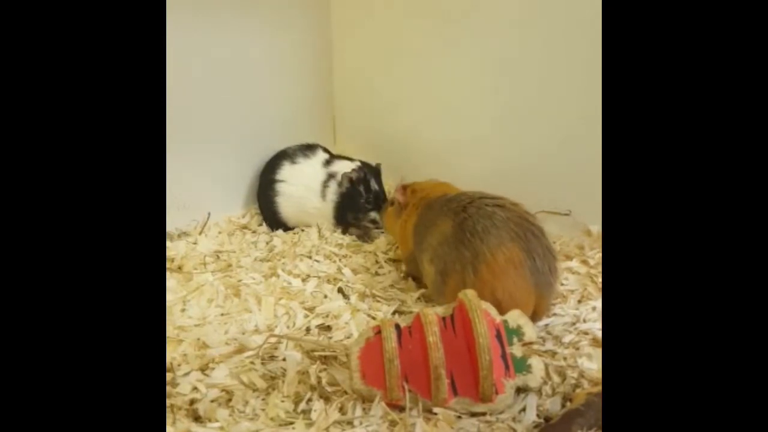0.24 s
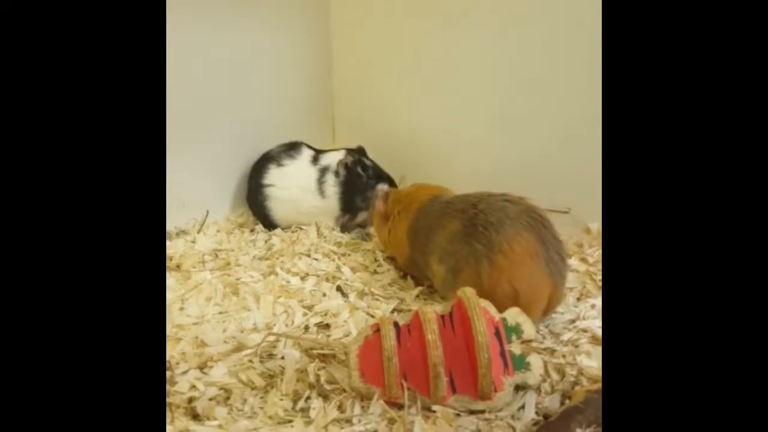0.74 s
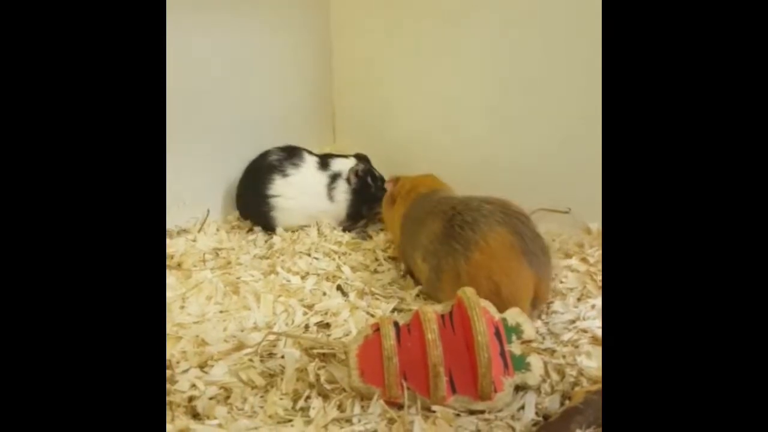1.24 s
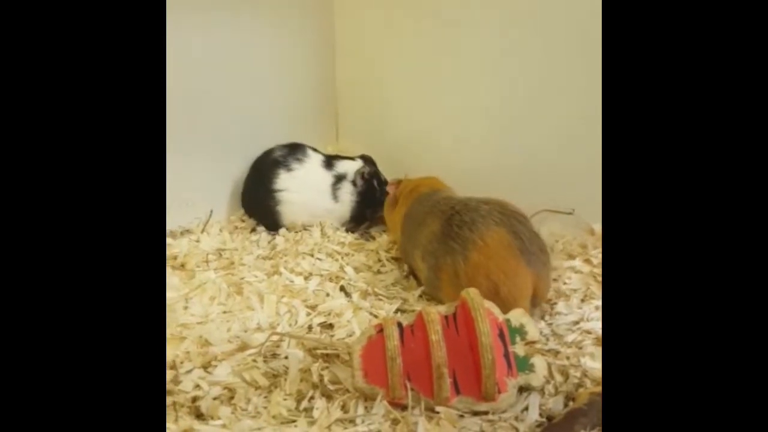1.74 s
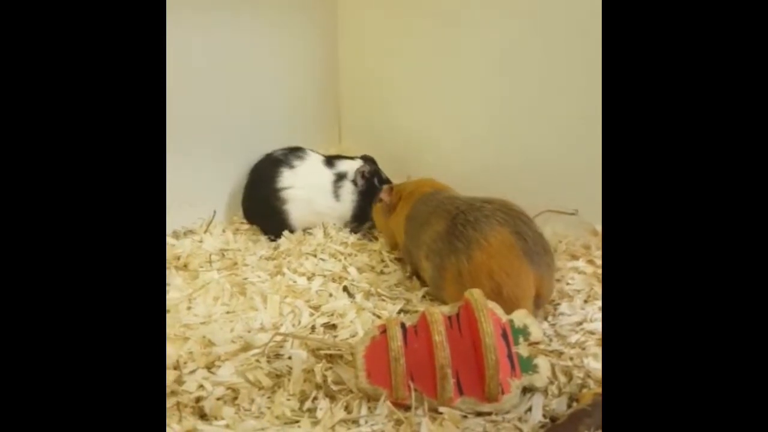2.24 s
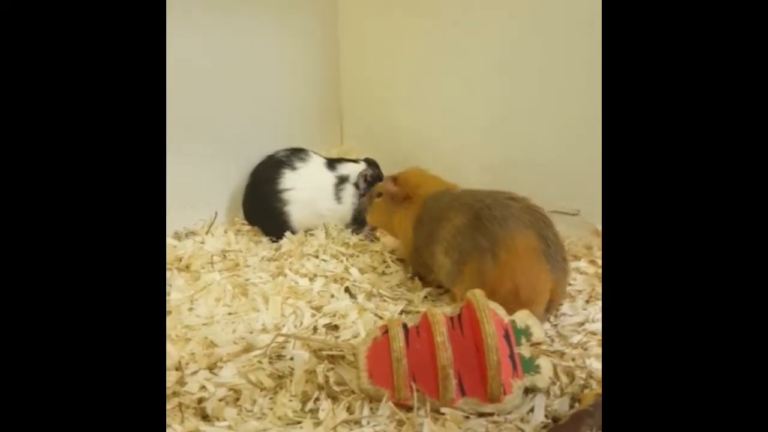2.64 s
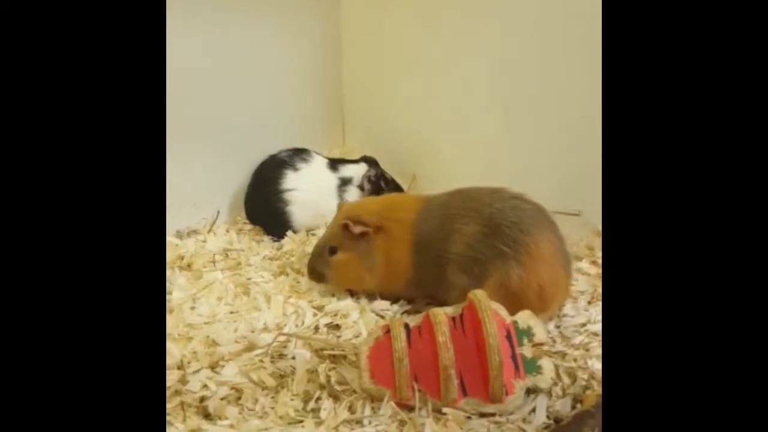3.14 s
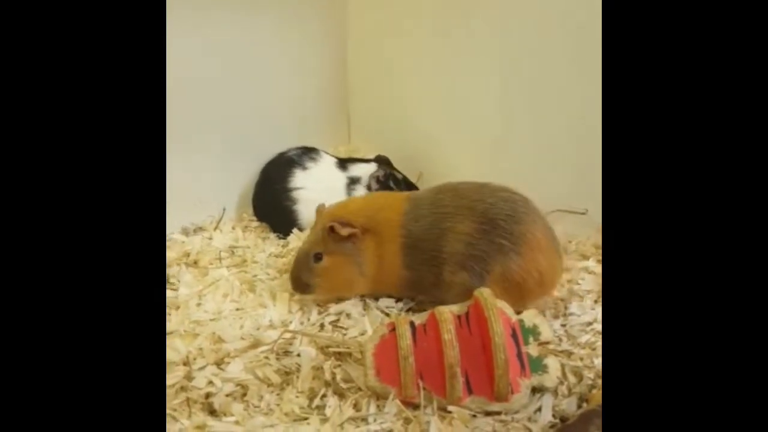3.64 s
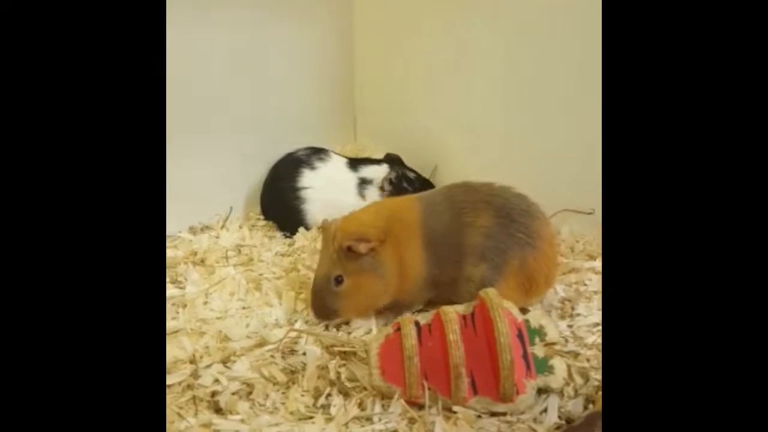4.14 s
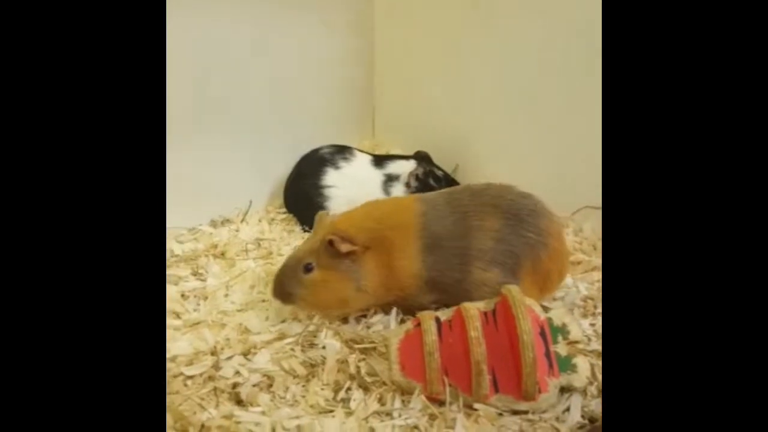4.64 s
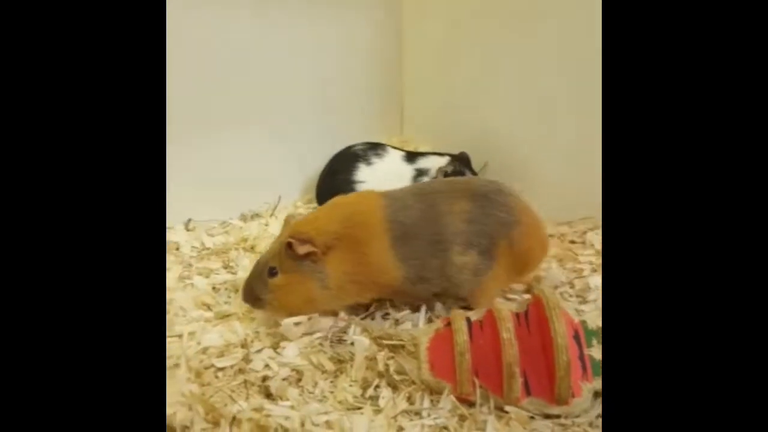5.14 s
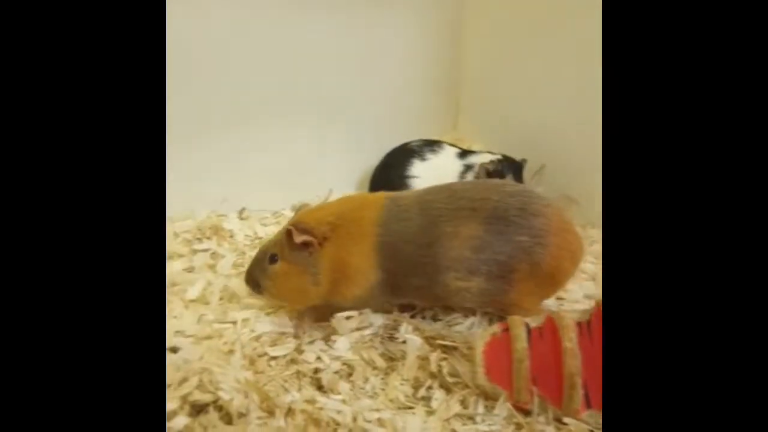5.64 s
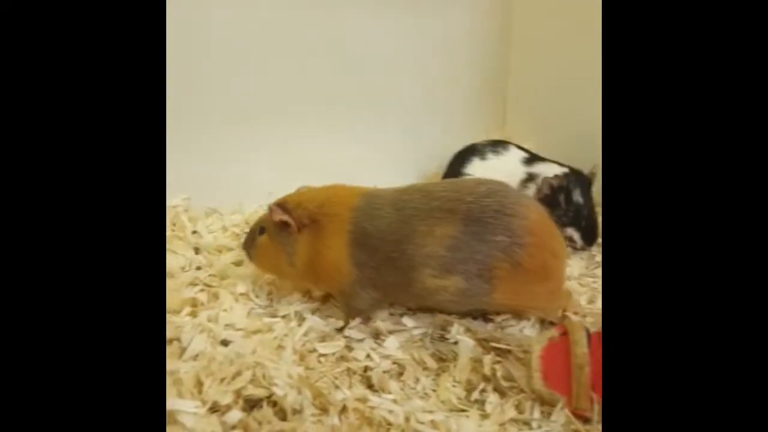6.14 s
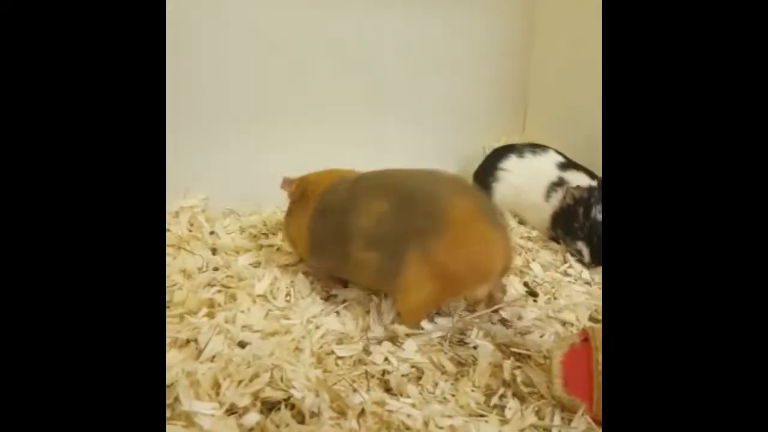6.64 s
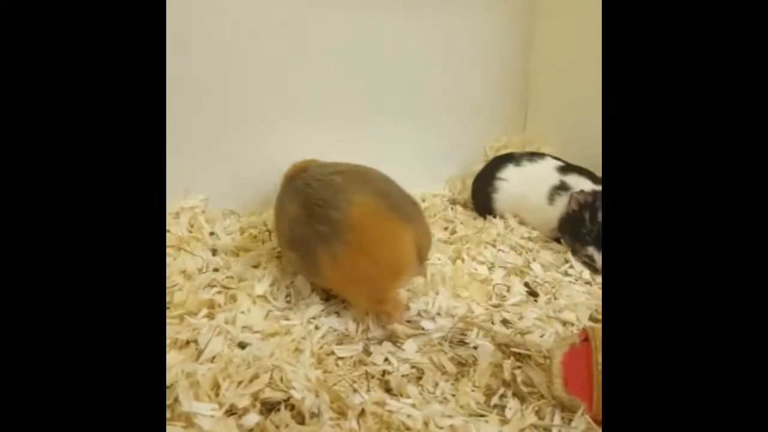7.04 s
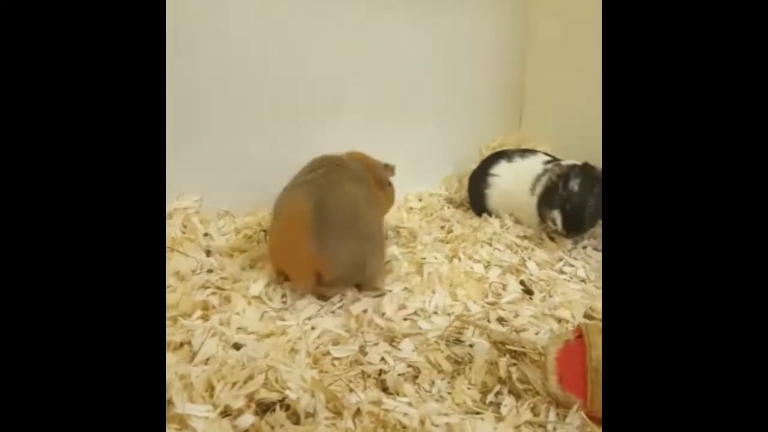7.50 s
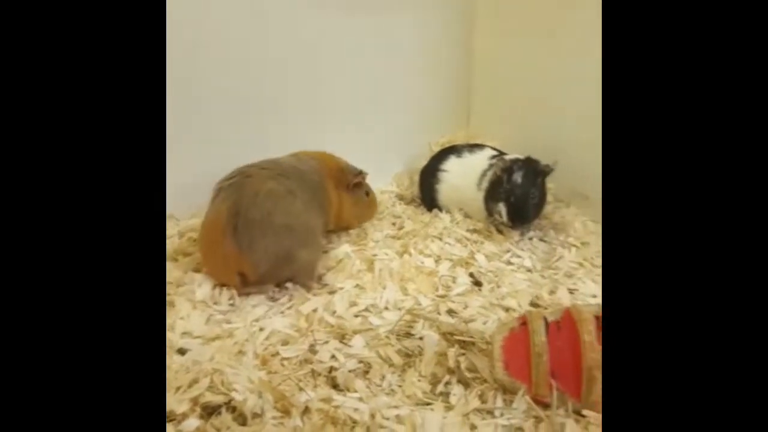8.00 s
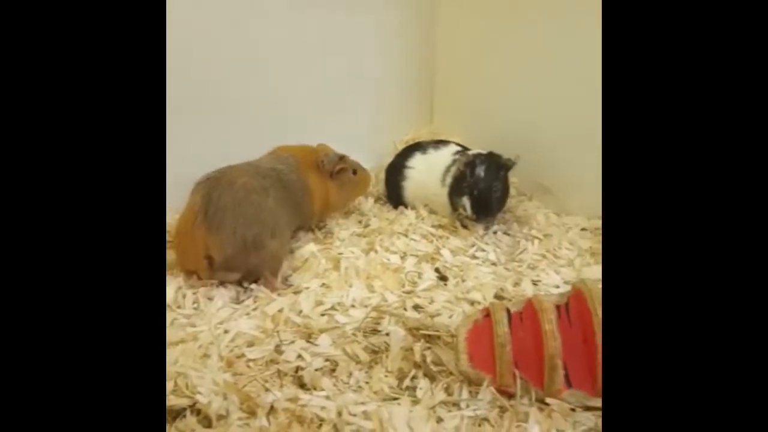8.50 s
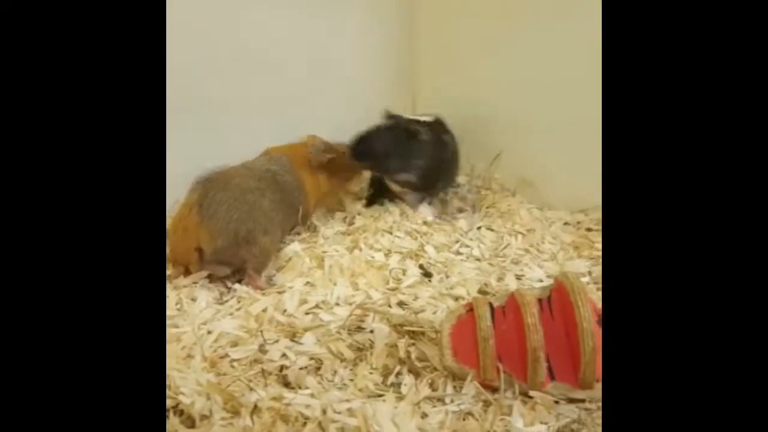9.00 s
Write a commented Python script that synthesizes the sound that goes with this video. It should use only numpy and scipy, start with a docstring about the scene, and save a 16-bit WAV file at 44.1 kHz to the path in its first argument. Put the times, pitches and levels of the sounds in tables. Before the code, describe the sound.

Rapid squeaky, raspy guinea pig chatter with two short throaty rumbles, shavings crunching underfoot, and a constant low electrical hum in a small bare room.

```python
"""Guinea pigs in wood shavings

Two guinea pigs meet in the corner of a littered pen in a small bare room, a little left of the microphones.
They chut, yip, whine and croak: swept overtones with half-pitch lines and rasp; one rumbles as it struts.
The shavings rustle and snap underfoot: noise and ringing clicks that swell with each shuffle.
An electrical appliance hums throughout, wavering tones and narrow whirring bands, over still room air."""
import sys
import numpy as np
from scipy import signal
from scipy.fft import rfft, irfft, next_fast_len
from scipy.io import wavfile

SR = 44100
rng = np.random.default_rng(int(sys.argv[2]) if len(sys.argv) > 2 else 0)


def pcm_store(signal):
    """Save signal as 16-bit PCM."""
    levels = np.round(np.clip(np.atleast_2d(signal), -1, 1) * 32767)
    wavfile.write(sys.argv[1], SR, levels.astype(np.int16).T)


N = 408366
TIME = np.arange(N) / SR

# grades of hoarseness: share of the voice that is rasp (0-1)
CLEAR, HUSKY, ROUGH, HARSH, BROKEN = .06, .19, .34, .52, .72
# a note opens just ahead of its listed time and sounds a little beyond its length
LEAD_S, OVERHANG_S = .003, 0.00814
# throat and mouth in yips and whines: hz, relative gain_db
YIP_WHINE_THROAT = [(250, 26), (400, -27), (560, 11), (800, -3.5), (1130, 10.5), (1650, -18.5), (2150, -5),
                    (2450, -12.5), (2900, -25), (3500, -40), (6000, -79)]
# spectrum of the rubbing shavings: hz, relative density_db (per Hz)
SHAVINGS_SPECTRUM = [(150, 8), (400, 4), (900, 6), (1800, 5.5), (3000, 5), (4500, 0), (6500, -1.5),
                     (9000, -1), (10500, -12), (12500, -1.5), (15500, -9)]


def from_db(db):
    """Decibels to an amplitude factor."""
    return 10 ** (np.asarray(db) / 20)


def rms_one(x):
    """Scale a sound to rms 1."""
    return x / np.sqrt(np.mean(x ** 2) + 1e-20)


def at_hz(points, hz):
    """A spectrum read on a log-frequency axis."""
    knots, values = np.transpose(points)
    return np.interp(np.log(np.maximum(hz, 1)), np.log(knots), values)


def colour(x, spectrum):
    """Give a sound the shape of a spectrum."""
    size = next_fast_len(x.shape[-1])
    gain = from_db(at_hz(spectrum, np.fft.rfftfreq(size, 1 / SR)))
    return irfft(rfft(x, size) * gain, size)[..., :x.shape[-1]]


def swings(rate_hz, t, knot_count=1024):
    """Smooth chance over the times t, up to a given rate; spread 1."""
    knots = rng.standard_normal(knot_count)
    return np.interp(t * 2 * rate_hz, np.arange(knot_count), knots) * np.sqrt(3 / 2)


def drift(rate_hz):
    """Smooth chance over the whole scene; spread 1."""
    return swings(rate_hz, TIME, N // 8)


def stereo_noise(spectrum):
    """Coloured noise, alike at both microphones mainly in the bass; rms 1."""
    # likeness of left and right: hz, correlation (-1 to 1)
    likeness = [(60, 0.85), (150, 0.8), (300, 0), (2000, 0.018)]
    size = next_fast_len(N)
    alike = np.clip(at_hz(likeness, np.fft.rfftfreq(size, 1 / SR)), -1, 1)
    mid, side = rfft(rng.standard_normal((2, size)))
    mid, side = np.sqrt(1 + alike) * mid, np.sqrt(1 - alike) * side
    pair = irfft(mid + side * [[1], [-1]], size)[:, :N]
    return rms_one(colour(pair, spectrum))


def pan(left_db):
    """Gains for both channels, left_db apart."""
    return from_db(np.array([[1], [-1]]) * left_db / 2)


def fading(hits, decay_s):
    """Each hit starts an exponential decay."""
    return signal.lfilter([1], [1, -np.exp(-1 / (decay_s * SR))], hits + 1e-18)


def ages(length_s):
    """The time since the start of a note, sample by sample."""
    return np.arange(max(int(length_s * SR), 2)) / SR


def add(out, s, sound):
    """Mix a sound in at a time."""
    first = max(int(s * SR), 0)
    part = out[first:first + len(sound)]
    part += sound[:len(part)]


def room_air(level_db=-41.5):
    """Still air of the room: steady noise, weighted to the bass."""
    # its spectrum: hz, relative density_db (per Hz)
    air = [(20, -2), (50, -1), (80, 11.5), (140, -4.5), (250, 3), (450, -9.5), (900, -10.5), (2000, -18),
           (4000, -27), (9000, -30.5), (15500, -32)]
    return from_db(level_db) * stereo_noise(air)


def appliance():
    """Mains hum and motor tones, with a soft whir in the resonances of the housing."""
    # hum tones: pitch_hz, level_db (rms before waver and pan), waver (0-1)
    hum = [(100.1, -31, 0.07), (200, -45, 0.17), (247.8, -55, 0.3), (301.2, -48.5, 0.27),
           (377.8, -58, 0.33)]
    # whirring bands: centre_hz, width_hz, level_db (rms before pan)
    housing = [(648, 105, -51.5), (1636, 69, -55.5), (2600, 540, -55.5)]
    out = np.zeros((2, N))
    for hz, level_db, waver in hum:
        # a complex swing moves both loudness and phase
        swing = 1 + waver * (drift(3.6) + 1j * drift(4))
        out += from_db(level_db) * np.sqrt(2) * np.imag(swing * np.exp(2j * np.pi * hz * TIME))
    for hz, width_hz, level_db in housing:
        b, a = signal.iirpeak(hz, hz / width_hz, fs=SR)
        whir = signal.lfilter(b, a, rng.standard_normal((2, N)))
        out += from_db(level_db) * rms_one(whir)
    return out * pan(left_db=1.25)


def stirring(attack_s=0.089, settle_s=0.046, rest_db=-66, uneven_db=1.6, swell_db=5, crest=0.44):
    """How hard the bedding is stirred: each shuffle swells to a crest, wavers and settles."""
    # feet shuffling through the shavings: start_s, length_s, level_db (before swell and waver)
    shuffles = [(0.84, 0.46, -48), (1.956, 0.031, -47.5), (2.05, 0.048, -41.5), (2.759, 0.33, -54),
                (3.218, 0.019, -53), (3.837, 0.1, -44.5), (4.194, 0.044, -47.5), (4.258, 0.17, -48.5),
                (4.575, .025, -53), (4.863, 0.56, -53.5), (5.766, 0.37, -46.5), (6.063, 0.095, -40),
                (6.442, 0.14, -49.5), (6.66, 0.087, -42), (6.802, .25, -46), (7.197, 0.033, -45),
                (7.323, 0.53, -50.5), (7.561, 0.033, -42), (7.974, 0.14, -47), (8.288, 0.14, -50.5),
                (8.41, 0.17, -50.5), (8.72, 1, -46), (9.091, 0.15, -35)]
    power = from_db(rest_db) ** 2
    for s, length_s, db in shuffles:
        away = np.maximum((s - TIME) / attack_s, (TIME - s - length_s) / settle_s)
        edges = np.exp(-np.clip(away, 0, 20))
        arch = 1 / 3 - 4 * (np.clip((TIME - s) / length_s, 0, 1) - crest) ** 2
        power = power + (from_db(db + swell_db * arch) * edges) ** 2
    return np.sqrt(power) * from_db(uneven_db * drift(12))


def crackle(ticks_per_s=220, sharpness=5, level_db=-7):
    """Single shavings flick past each other, each tick ringing at one of nine pitches."""
    born = rng.random(N) < ticks_per_s / SR
    sizes = rng.uniform(-1.16, 1, (2, N)) * born
    pitches_hz = np.geomspace(900, 11000, 9)
    dealt = rng.integers(0, len(pitches_hz), N)
    ticks = 0
    for k, hz in enumerate(pitches_hz):
        b, a = signal.iirpeak(hz, sharpness, fs=SR)
        ticks = ticks + signal.lfilter(b, a, sizes * (dealt == k) + 1e-18) / hz ** .7
    return from_db(level_db) * rms_one(ticks)


def crunches(per_band_per_s=12, level_db=-9, decay_s=0.0068):
    """Small clumps of shavings give way, each crunching in one of six bands of noise."""
    edges_hz, out = np.geomspace(1000, 15000, 7), 0
    for low, high in zip(edges_hz, edges_hz[1:]):
        hits = (rng.random(N) < per_band_per_s / SR) * rng.uniform(.3, 1, N)
        sos = signal.butter(2, [low, high], "band", fs=SR, output="sos")
        band = signal.sosfilt(sos, rng.standard_normal((2, N)))
        out = out + fading(hits, decay_s) * rms_one(band)
    return from_db(level_db) * rms_one(out)


def rustle(grains_per_s=700, level_db=1):
    """Shavings slide over each other in a hiss, with tiny cracks of all sizes."""
    born = rng.random(N) < grains_per_s / SR
    sizes = from_db(3.5 * np.minimum(rng.exponential(1, N), 4))
    cracks = rms_one(fading(born * sizes, decay_s=.0006))
    hiss = rms_one(1 + .25 * cracks) * stereo_noise(SHAVINGS_SPECTRUM)
    return from_db(level_db) * stirring() * (hiss + crackle() + crunches())


def snaps(decay_s=0.013, level_db=-6):
    """A dry shaving breaks with a short splintering burst: noise under a fast decay."""
    # single shavings snapping: start_s, strength_db (before the layer's level)
    breaks = [(2.101, -33), (3.777, -34), (4.2228, -31.5), (4.572, -36), (5.226, -32), (7.0242, -30.5),
              (8.4076, -29.5)]
    s, strength_db = np.transpose(breaks)
    hits = np.bincount((s * SR).astype(int), from_db(strength_db), N)
    return from_db(level_db) * fading(hits, decay_s) * stereo_noise(SHAVINGS_SPECTRUM)


def creaks(width_hz=600, decay_s=0.018):
    """A trodden shaving rubs briefly: noise ringing at its own pitch, dying away."""
    # shavings creaking under a foot: start_s, pitch_hz, level_db (before the decay)
    treads = [(3.777, 2680, -37.5), (6.69, 2800, -42)]
    out = np.zeros((2, N))
    t = ages(.2)
    for s, wood_hz, db in treads:
        b, a = signal.iirpeak(wood_hz, wood_hz / width_hz, fs=SR)
        rubbing = rng.standard_normal((2, len(t)))
        for _ in range(2):
            rubbing = signal.lfilter(b, a, rubbing)
        for channel, sound in zip(out, from_db(db) * np.exp(-t / decay_s) * rms_one(rubbing)):
            add(channel, s, sound)
    return out


def rumble(fall=0.061, length_s=0.034, jitter=0.053, rasp=0.38, level_db=-5,
           crest=0.47, taper_db=8, uneven_db=5.0):
    """A purr of short, rough, falling grunts, about fifteen a second; each bout swells and weakens."""
    # colour of a grunt: hz, relative gain_db
    chest = [(200, -2.5), (330, 4.5), (480, -18), (680, -3.5), (1100, -16.5), (1600, -28), (3000, -37)]
    # bouts: start_s, length_s, period_s between grunts, mid pitch_hz, crest_db (before unevenness and level)
    bouts = [(3.178, 1, .0665, 352, -29.5), (4.739, 0.66, .0675, 330.7, -27)]
    out, flutter = np.zeros(N), drift(250)
    noise = rms_one(colour(rng.standard_normal(N), chest))
    multiple = np.arange(1, 6)[:, None]
    for start, bout_s, period_s, pitch_hz, crest_db in bouts:
        for s in np.arange(start, start + bout_s, period_s):
            from_crest = 2 * ((s - start) / bout_s - crest)
            db = crest_db - taper_db * from_crest ** 2 + uneven_db * rng.standard_normal()
            on = np.flatnonzero((TIME > s) & (TIME < s + length_s))
            age = (TIME[on] - s) / length_s
            pitch = pitch_hz * (1 + fall * (.5 - age) + jitter * flutter[on])
            phase = 2 * np.pi * np.cumsum(pitch) / SR
            tone = np.sum(from_db(at_hz(chest, multiple * pitch)) * np.sin(multiple * phase), axis=0)
            pulse = np.sin(np.pi * age ** 0.74) ** 2
            out[on] += from_db(db + level_db) * pulse * (tone + rasp * noise[on])
    return out


def brighter(spectrum, upper_db):
    """A spectrum with its upper overtones raised, as by an opening mouth."""
    # the lift sets in between these: from_hz, full_hz
    upper_overtones_hz = (1250, 1900)
    return [(hz, db + np.interp(hz, upper_overtones_hz, [0, upper_db])) for hz, db in spectrum]


def voice(pitch, loud_db, overtone_db, half_db, rasp, attack_s, throat, burr_db, release_s=0.0049,
          jitter=0.011, thinning_db=-13, hiss_db=-2, flap_hz=250):
    """The vocal folds: rich when low, thinner when high, doubling their period and rasping when pressed."""
    # the rasp as it leaves the mouth: hz, relative density_db (per Hz)
    rasp_spectrum = [(150, -18), (260, 3.5), (400, -13), (580, 1), (1100, 6.5), (1550, -5.5), (2100, -7.5),
                     (2850, -5.5), (3500, -23.5), (6000, -59)]
    rasp_brightens = 0.36   # dB of treble in the rasp per dB of overtones
    flare_hz, flare_octaves, flare_peak_db = 1083, 0.057, 4   # flare: centre, half width, gain
    t = np.arange(len(pitch)) / SR
    flap = np.sin(2 * np.pi * np.cumsum(flap_hz * (1 + 0.224 * swings(58.5, t))) / SR)
    hiss = colour(rng.standard_normal(SR // 4), brighter(rasp_spectrum, rasp_brightens * overtone_db))
    hiss = rms_one(hiss)[:len(t)]
    # the voice flares as its pitch crosses a narrow band near 1.08 kHz
    flare_db = flare_peak_db * np.exp(-(np.log2(pitch / flare_hz) / flare_octaves) ** 2)
    loud_db = loud_db + flare_db - flare_db.mean()
    pitch = pitch * (1 + rasp ** 2 * .25 * swings(450, t))
    phase = 2 * np.pi * np.cumsum(pitch * (1 + jitter * swings(90.0, t))) / SR
    # half multiples are the lines of the doubled period
    multiple = np.arange(1, 21)[:, None] / 2
    # stretched folds no longer close fully, so overtones fade as the pitch climbs
    closure_db = overtone_db + thinning_db * np.log2(pitch / 580)
    lines_db = at_hz(throat, multiple * pitch)
    lines = from_db(lines_db + (multiple > 1) * closure_db + (multiple % 1 > 0) * half_db)
    tone = np.sum(lines * np.sin(multiple * phase), axis=0) / np.sqrt(np.sum(lines ** 2, axis=0) / 2)
    sound = np.sqrt(1 - rasp ** 2) * tone + rasp * from_db(hiss_db) * hiss
    # a slower flutter rides on the pressed voice: sidebands and a low burr
    sound = sound * (1 + .9 * rasp * flap) + from_db(burr_db) * rasp * flap
    # the loudness trembles
    sound = sound * from_db((1.2 + 2.5 * rasp) * swings(60, t))
    edges = np.minimum(t / attack_s, 1) * np.minimum((t[-1] - t) / release_s, 1)
    return sound * edges * from_db(loud_db)


def croaks(overtone_db=-7, half_db=-22):
    """The voice drops to a low buzz: the folds lock onto a slow, level beat."""
    # throat and mouth in a croak: hz, relative gain_db
    croak_throat = [(200, -17), (380, -9), (750, 1.5), (1120, -0.5), (1500, -28), (2200, -15.5),
                    (3050, -33), (3600, -50)]
    # croaks: start_s, length_s, pitch_hz, level_db (before the voice trembles)
    notes = [(1.49, .055, 379.7, -25.5), (1.598, 0.048, 358, -23.5), (1.642, 0.046, 433, -24.5),
             (8.866, 0.044, 335, -23.5)]
    out = np.zeros(N)
    for s, length_s, hz, db in notes:
        pitch = np.full_like(ages(length_s), hz)
        add(out, s - LEAD_S, voice(pitch, db, overtone_db, half_db, HUSKY, attack_s=.005,
                                   throat=croak_throat, burr_db=-11))
    return out


def chuts(half_db=-28, level_db=-1):
    """A low hooked note sinks onto its pitch and lifts again; the stronger its overtones, the huskier."""
    # throat and mouth in a chut: hz, relative gain_db
    chut_throat = [(280, 9), (560, 11.5), (800, 7.5), (1130, 9), (1400, 2.5), (1700, -9.5), (2400, -4.5),
                   (2900, -19), (6000, -77)]
    # chuts: start_s, length_s, low pitch_hz, hook depth (share of pitch), note_db (before the layer's level),
    # swell_db over the note, overtone_db, upper_db (lift of the upper overtones)
    notes = [(0.333, 0.077, 531, 0.27, -29, 9, -6, 6), (.819, 0.068, 557, 0.25, -24.5, 6, -3, 8.5),
             (1.35, 0.077, 528, .24, -24, 4.5, 1.5, -1), (1.786, 0.077, 504, 0.31, -24.5, 9, -0.5, -3.5),
             (2.013, 0.088, 533.5, 0.18, -23.5, 3.5, 0.5, 1.5),
             (2.15, 0.032, 552, 0.028, -27, 17, -1.5, -1), (2.35, 0.074, 506, 0.45, -27.5, 9, 0, -5),
             (2.621, 0.082, 526, .33, -27, 4.5, -1, -8), (2.85, 0.054, 553.5, .33, -26, 3, -2.5, -7),
             (3.048, 0.051, 588, 0.076, -30.5, 10, -0.5, -3), (3.348, 0.033, 585, .074, -32, 9, 1.5, -14),
             (3.587, .044, 596.5, 0.16, -28.5, -3.5, -5, -9), (4.386, .042, 643, 0.03, -25.5, 3, -11, -8),
             (4.951, 0.043, 642, .11, -29, 7, -12, -8), (5.58, 0.062, 594, .16, -31.5, -3, -18, -8),
             (5.876, 0.026, 648, 0.071, -31, 13, -21, -8), (6.6, 0.023, 649, .04, -31.5, 4, -15, -8),
             (6.798, 0.033, 703, 0.083, -27.5, 12, 1, -15), (7.4, 0.048, 620, 0.16, -30.5, -3, -8, -8),
             (7.839, 0.023, 675, 0.018, -26.5, 5, -13, -6), (8.231, .04, 563, .2, -21.5, 4, -1.5, -12),
             (8.648, 0.035, 571, 0.17, -22.5, 7, -3, -14),
             (9.177, 0.053, 601.4, 0.077, -21.5, 6, 0.5, 10.5)]
    # share of the note spent sinking; roundness; share of the drop regained
    low_at, curve, regained = 0.503, 2.02, 0.615
    out = np.zeros(N)
    for s, length_s, hz, depth, db, swell_db, overtone_db, upper_db in notes:
        t = ages(length_s + OVERHANG_S)
        age = t / t[-1]
        sinking = np.maximum(1 - age / low_at, 0) ** curve
        lifting = np.maximum((age - low_at) / (1 - low_at), 0) ** curve
        pitch = hz * (1 + depth * (sinking + regained * lifting))
        loud_db = db + level_db + swell_db * (age - .5)
        rasp = np.interp(overtone_db, [-12, 3], [CLEAR, HUSKY])
        add(out, s - LEAD_S, voice(pitch, loud_db, overtone_db, half_db, rasp, attack_s=0.0033,
                                   throat=brighter(chut_throat, upper_db), burr_db=-21))
    return out


def yips(half_db=-14, level_db=-3.0, from_hz=500, ease=1.5, fade_db_per_octave=4.5):
    """The voice cracks and leaps up half an octave to two, slowing toward its top and weakening as it goes."""
    # yips: start_s, length_s, top_hz, note_db (at from_hz, before the layer's level), overtone_db,
    # hoarseness (0-1)
    notes = [(0.393, .05, 1960, -25.5, -2, BROKEN), (.881, 0.05, 1630, -24, 1, BROKEN),
             (1.413, 0.059, 1620, -27, -5, BROKEN), (1.533, 0.028, 1560, -26, 0, HARSH),
             (1.849, 0.052, 1533, -22.5, -1, HARSH), (2.081, 0.045, 1533, -21, -7, HARSH),
             (2.413, .046, 1544, -25, -4, HARSH), (2.679, 0.03, 1186, -20, -8, HUSKY),
             (2.903, 0.028, 1224, -20.5, -0.5, ROUGH), (3.386, .03, 1295, -20.5, -4.5, ROUGH),
             (3.627, .025, 850, -25.5, -9, HUSKY), (4.256, 0.026, 920, -27.5, -18, CLEAR),
             (4.991, 0.018, 880, -28, -11, HUSKY), (5.305, 0.013, 770, -27, -16, CLEAR),
             (5.911, .016, 827, -26, -2, CLEAR), (7.341, 0.018, 1259, -24.5, -4, HUSKY),
             (7.431, 0.027, 1436, -24.5, -6, ROUGH), (7.511, 0.028, 1207, -22, -4, HUSKY),
             (7.875, 0.017, 1127, -21, -10, ROUGH), (8.273, 0.038, 1390, -25.5, -20, BROKEN),
             (8.681, 0.039, 1530, -24.5, -12, BROKEN)]
    out = np.zeros(N)
    for s, length_s, top_hz, db, overtone_db, rasp in notes:
        t = ages(length_s + OVERHANG_S)
        octaves = np.log2(top_hz / from_hz) * (1 - (1 - t / t[-1]) ** ease)
        loud_db = db + level_db - fade_db_per_octave * octaves
        add(out, s - LEAD_S, voice(from_hz * 2 ** octaves, loud_db, overtone_db, half_db, rasp,
                                   attack_s=0.01, throat=YIP_WHINE_THROAT, burr_db=-5.5))
    return out


def whines(level_db=-1, scoop_curve=1.385, flat_per_octave=1.495, fade_db_per_octave=14.5):
    """The high voice swings in chained scoops, weakening as its pitch is pulled up; broken ones ease in."""
    # scoops: start_s, fall_s, climb_s, first_hz, turning low_hz, last_hz,
    # note_db (at the turn, before the layer's level), overtone_db, half_db (half-pitch lines), hoarseness (0-1)
    scoops = [(0, 0.0066, 0.037, 1205, 1299, 1478, -31, 19, -20, HARSH),
              (.048, 0.026, .004, 1480, 1445, 1450, -29.5, 18, -18.5, HUSKY),
              (.075, 0.064, 0.026, 1443, 1129, 1670, -29.5, 16, -23, ROUGH),
              (.446, 0.047, 0.054, 2047, 1133, 1710, -29.5, 17, -14, ROUGH),
              (.545, 0.055, 0.044, 1750, 1140, 1550, -30, 17, -28, ROUGH),
              (0.629, 0.013, .022, 1500, 1465, 2000, -31, 21, -25, ROUGH),
              (.662, 0.038, 0.0032, 1990, 1460, 1510, -32.5, 19, -27, ROUGH),
              (.92, 0.047, 0.056, 1645, 1456, 1697, -31, 6, -27, HARSH),
              (1.015, .06, 0.022, 1700, 1686, 1710, -31.5, 16, -24.5, ROUGH),
              (1.096, .055, 0.0044, 1694, 1487, 1440, -32, 21, -25, ROUGH),
              (1.153, 0.036, 0.035, 1460, 1270, 1900, -27, 16, -24, HUSKY),
              (1.463, 0.029, 0.0024, 1550, 760, 770, -24.5, -3, -6, ROUGH),
              (1.562, 0.037, 0.0045, 1553, 723, 720, -27, -8, 0, HARSH),
              (2.461, 0.043, 0.031, 1588, 1013, 1012, -26.5, -1, -8, ROUGH),
              (7.465, 0.016, 0.0086, 1420, 1002, 986, -23.5, -11, -37, HUSKY),
              (7.549, .042, .027, 1203, 1029, 1088, -20.5, -1, -41, CLEAR),
              (7.623, 0.019, 0.0384, 1163, 1066, 1141, -25.5, -15, -37, CLEAR),
              (7.929, 0.039, 0.049, 1455, 1200, 1554, -33.5, 10, -28, HARSH),
              (8.021, 0.033, 0.051, 1534, 1320, 1486, -36, 22, -23, HARSH),
              (8.333, 0.016, .039, 1188, 994, 1160, -24, -8, -19, ROUGH),
              (8.389, 0.047, 0.029, 1175, 975, 986, -26.5, 1, -25, HUSKY),
              (8.74, 0.019, 0.083, 1200, 1020, 1504, -27, -8, -31, HARSH),
              (8.845, .02, 0.0014, 1250, 935, 940, -24, -8, -24, ROUGH),
              (8.903, .022, .012, 1136, 1058, 1160, -26, -4, -22, HARSH),
              (8.945, 0.081, 0.033, 1653, 1338, 1495, -29, 15, -23, BROKEN)]
    out = np.zeros(N)
    for s, fall_s, climb_s, first_hz, low_hz, last_hz, db, overtone_db, half_db, rasp in scoops:
        # time zero is the turn
        t = ages(fall_s + climb_s + OVERHANG_S) - LEAD_S - fall_s
        depth = np.log2(np.where(t < 0, first_hz, last_hz) / low_hz)
        way_up = np.minimum(np.maximum(-t / fall_s, t / climb_s), 1)
        # deeper scoops have flatter bottoms
        octaves = depth * way_up ** (scoop_curve + flat_per_octave * np.abs(depth))
        loud_db = db + level_db - fade_db_per_octave * octaves
        onset_s = np.interp(rasp, [HARSH, BROKEN], [.004, .03])
        add(out, s - LEAD_S, voice(low_hz * 2 ** octaves, loud_db, overtone_db, half_db, rasp,
                                   attack_s=onset_s, throat=YIP_WHINE_THROAT, burr_db=-12.5))
    return out


def delayed(x, seconds):
    """A sound arriving later."""
    return np.interp(TIME - seconds, TIME, x, left=0)


def pen_walls(x):
    """The first echoes reach the two microphones at different moments."""
    # echoes of the pen's walls: left delay_s, right delay_s, level_db (relative to the direct sound)
    walls = [(.0011, 0.0021, -12), (.0063, 0.0042, -9.5), (.0108, 0.011, -8.5)]
    return sum(from_db(echo_db) * np.array([delayed(x, left_s), delayed(x, right_s)])
               for left_s, right_s, echo_db in walls)


def room(x, t60_s=0.26, build_s=0.11):
    """Dense echoes of the small bare room build up and die away."""
    t = TIME[:SR]
    tail = rng.standard_normal((2, SR)) * from_db(-60 * t / t60_s) * (1 - np.exp(-t / build_s))
    tail /= np.sqrt(np.sum(tail ** 2, axis=1, keepdims=True))
    return signal.fftconvolve(x[None], tail, axes=1)[:, :N]


def scene(room_db=-7, rumble_room_db=-3):
    """The animals sit a little to the left; hum and room air surround them."""
    # the bedding's treble leans to the left: hz, left minus right level_db
    bedding_side = [(4500, 2.5), (9000, 7)]
    lean = np.array(bedding_side)
    left, right = rustle() + snaps() + creaks()
    bedding = np.array([colour(left, lean * [1, .5]), colour(right, lean * [1, -.5])])
    purr = rumble()
    cries = croaks() + chuts() + yips() + whines()
    into_room = from_db(room_db) * cries + from_db(rumble_room_db) * purr
    echoes = pen_walls(cries + purr) + room(into_room)
    animals = (cries + purr + echoes) * pan(left_db=2.4)
    return room_air() + appliance() + bedding + animals


def record(dry, cutoff_hz=15800):
    """The top of the treble is cut steeply."""
    low_pass = signal.ellip(14, .05, 80, cutoff_hz, fs=SR, output="sos")
    return signal.sosfilt(low_pass, dry)


dry = scene()
out = record(dry)
pcm_store(out)
```